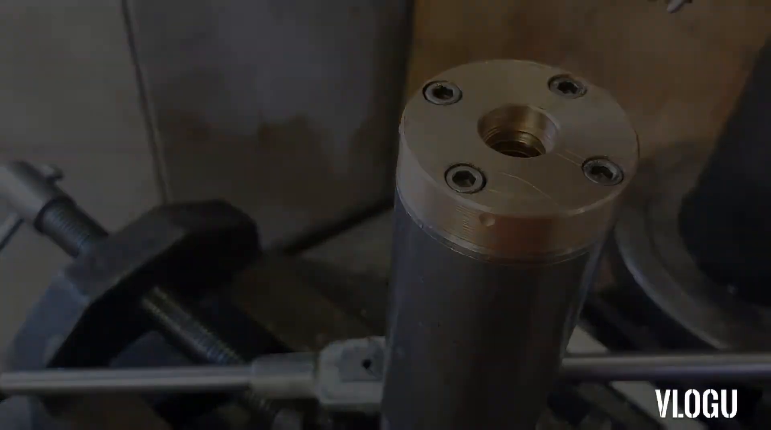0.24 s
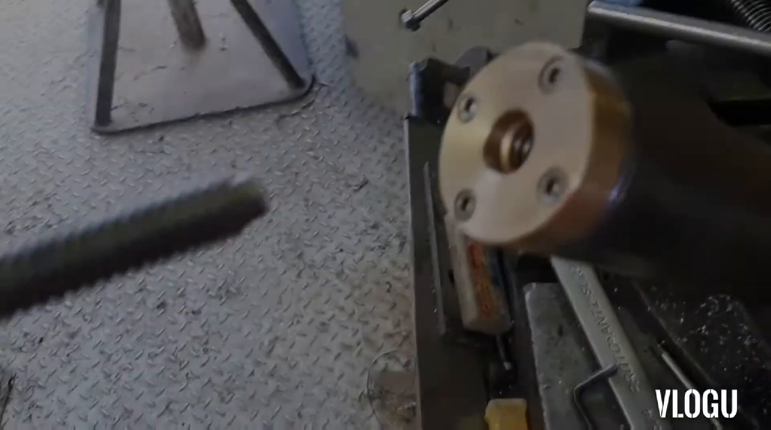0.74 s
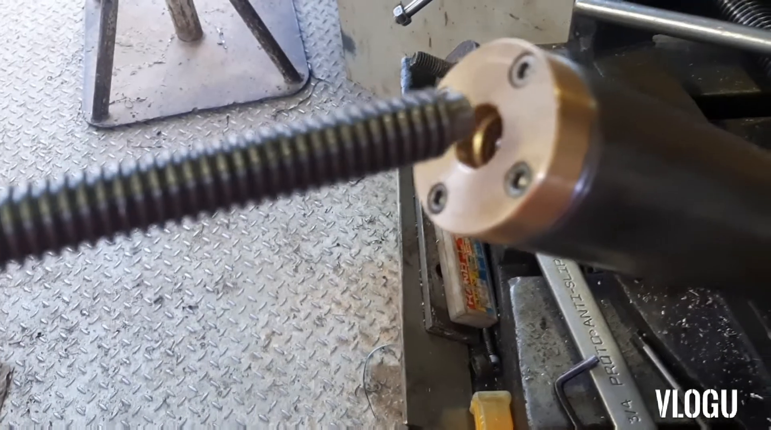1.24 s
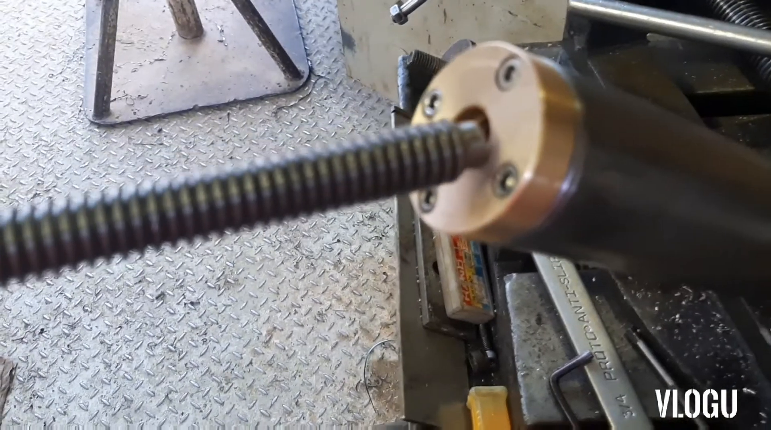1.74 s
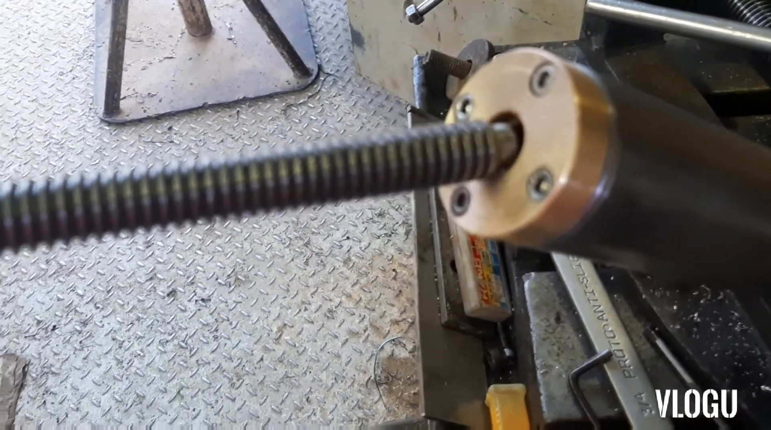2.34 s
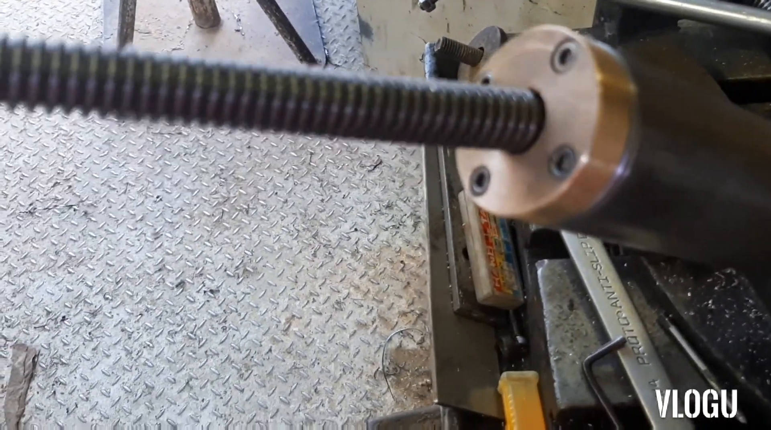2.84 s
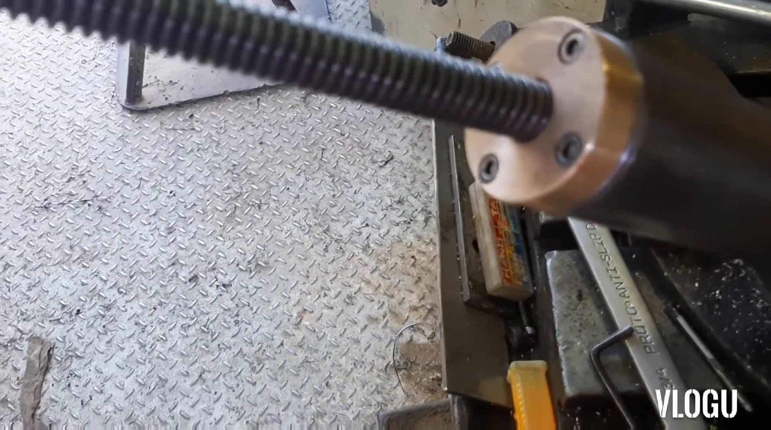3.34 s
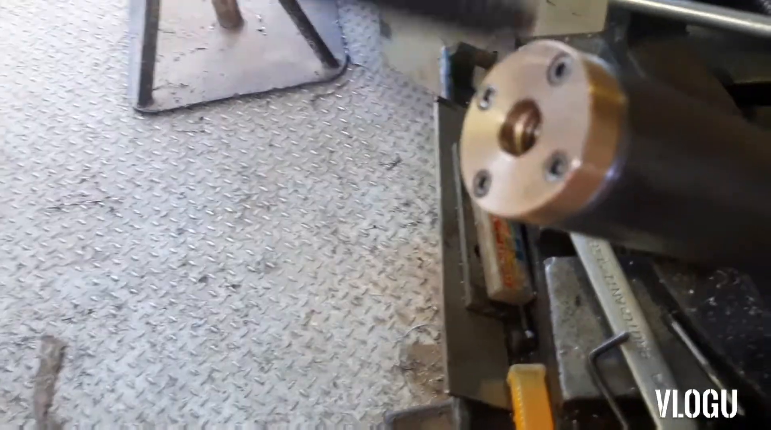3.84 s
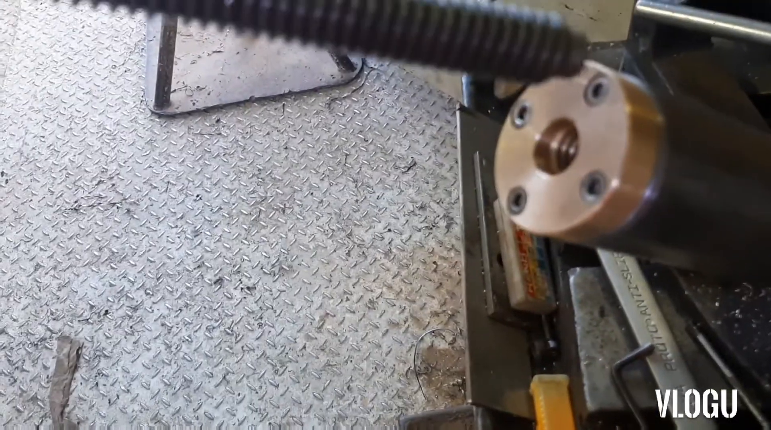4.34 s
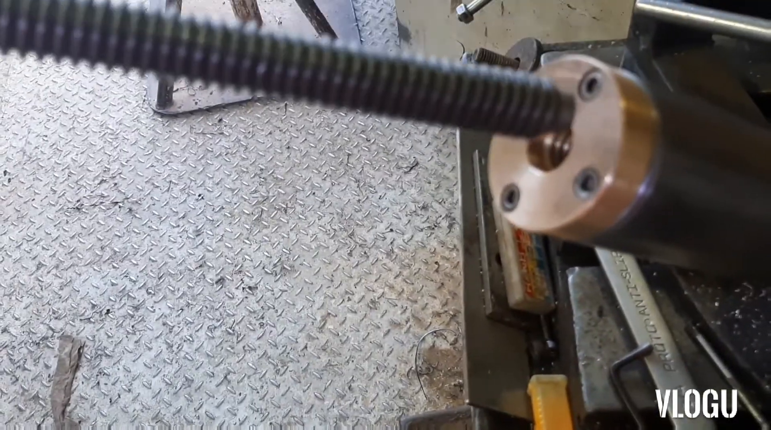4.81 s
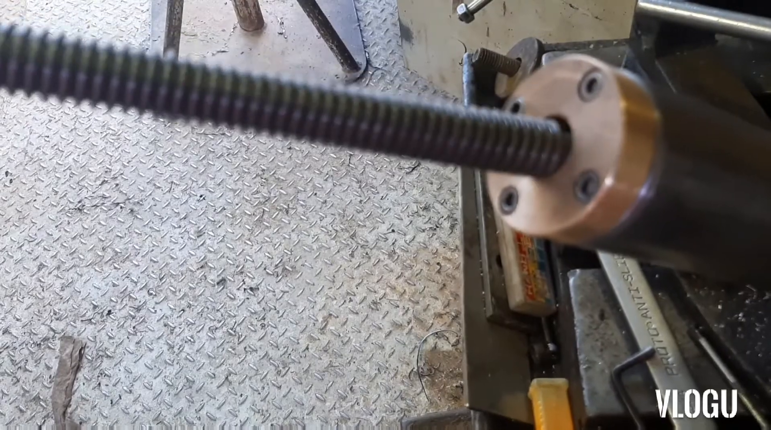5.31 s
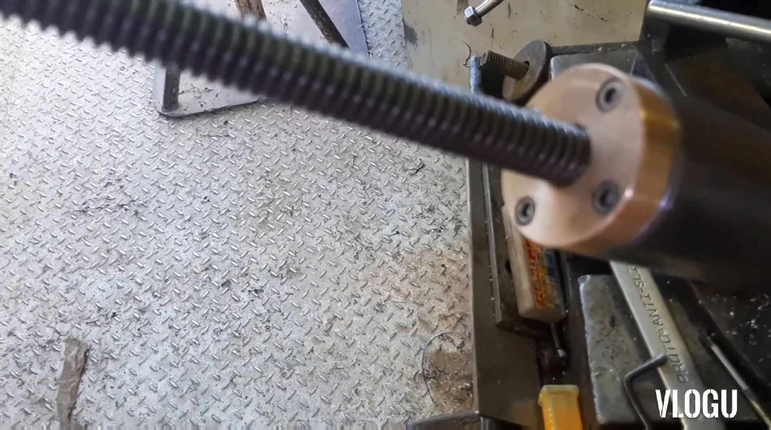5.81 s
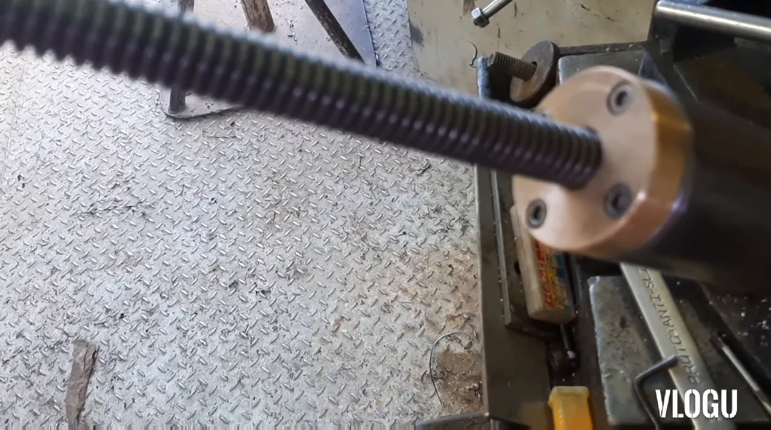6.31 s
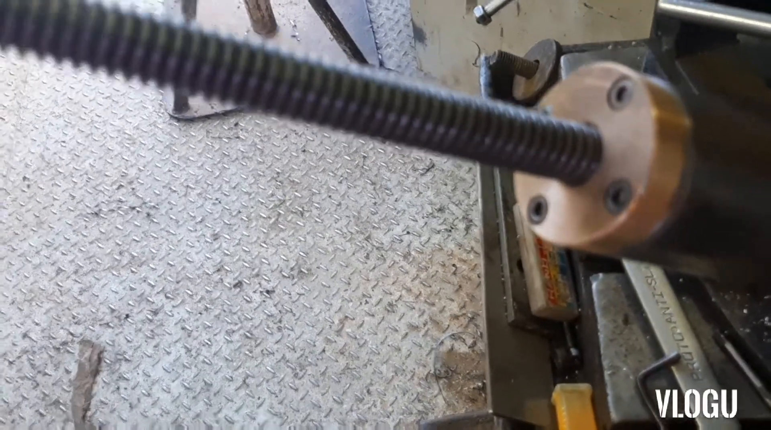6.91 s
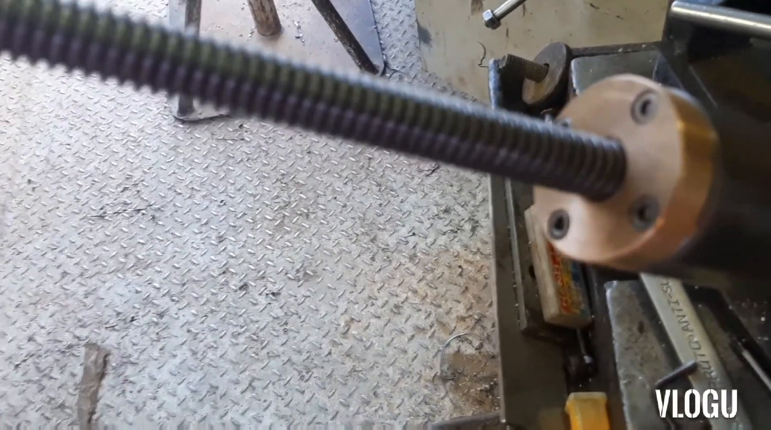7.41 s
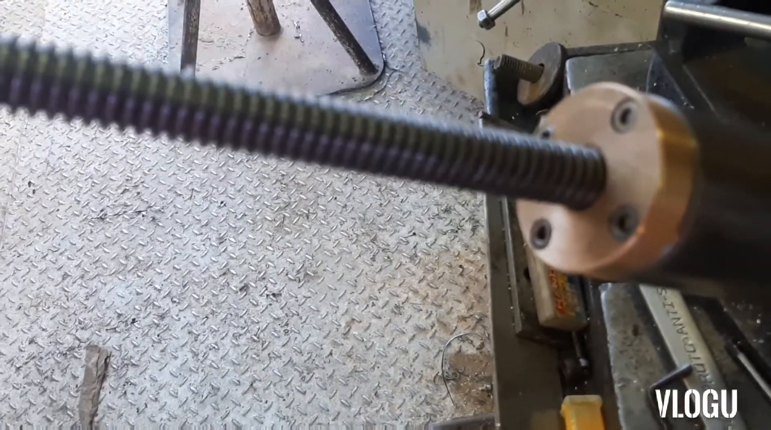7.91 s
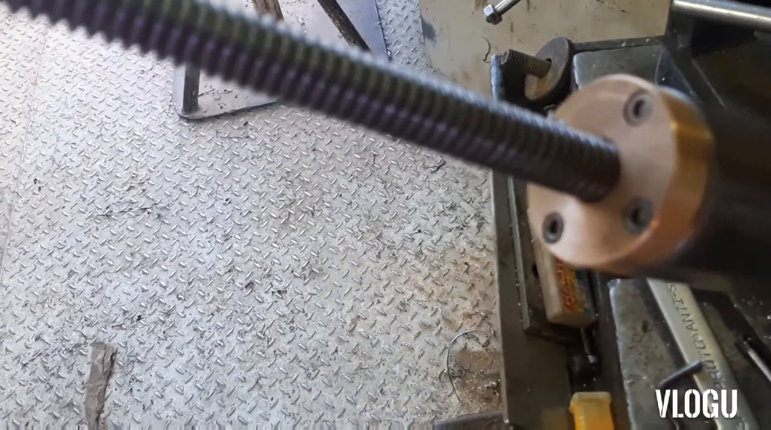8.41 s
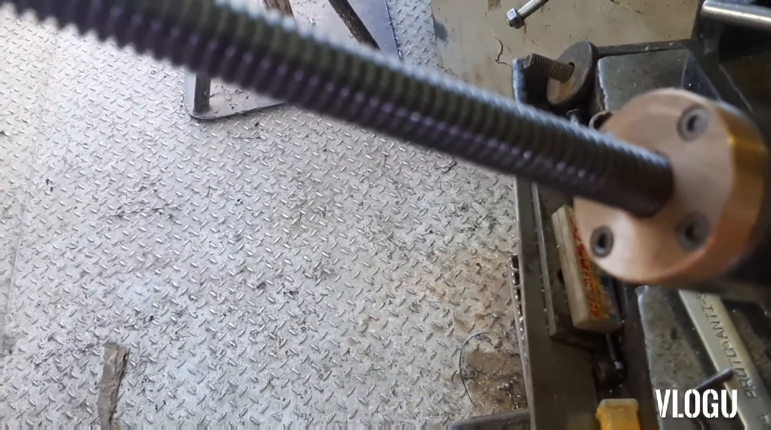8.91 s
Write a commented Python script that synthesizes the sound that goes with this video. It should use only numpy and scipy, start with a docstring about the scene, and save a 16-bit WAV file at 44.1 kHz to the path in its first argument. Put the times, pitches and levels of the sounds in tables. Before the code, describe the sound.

A lathe motor hums low with a steady pulsing throb under fan rush, drops out briefly near the start, then a few metallic clicks.

```python
"""Workshop, one microphone channel: a lathe's induction motor idles throughout, under the rush of fan and drive.
The rotor slips behind the mains field, so shaft tones and magnetic hum beat almost twice a second.
The first 1.2 s are quieter, with a short dropout to silence after 0.126 s; then the level steps up.
From 2.2 to 5.8 s a threaded steel rod, tried in a bronze nut close by, clicks a few times as filtered
noise bursts driving resonances, with a short room tail. The machine runs on to the end."""
import sys
import numpy as np
from scipy import signal
from scipy.fft import rfft, irfft
from scipy.io import wavfile

SR = 44100
rng = np.random.default_rng(int(sys.argv[2]) if len(sys.argv) > 2 else 0)


def wav_out(sig):
    """Save sig, one row per channel (or a flat mono array), as 16-bit PCM at SR to the path in sys.argv[1]."""
    wavfile.write(sys.argv[1], SR, np.round(np.clip(np.atleast_2d(sig).T, -1, 1) * 32767).astype(np.int16))


N = 403515
TIME = np.arange(N) / SR  # s
FREQS = np.maximum(np.fft.rfftfreq(N, 1 / SR), 1)  # Hz

MAINS_HZ, SHAFT_HZ = 60.012, 29.563
BEAT_CREST_S = 1.8125  # reference time at which the motor tones are aligned, apart from their spread

# Slow sway of the main hum at twice the mains frequency. Each row: time in seconds, level in dB rms.
HUM_SWAY = [(1.25, -27), (3.95, -27.5), (5.65, -26), (7.38, -28), (8.7, -26.5), (9.0, -27.5)]
# The uneven air gap modulates that hum once a turn.
# Each row: shaft turns added to the hum frequency, level in dB against the hum.
AIR_GAP_TONES = [(1, -10), (2, -9.5), (3, -22), (4, -40.5), (13, -37.5)]
# Other magnetic hum. Each row: multiple of the mains frequency, level in dB rms.
MAINS_TONES = [(1.5, -43.5), (4, -43.5), (5, -57.5), (6, -47.5), (8, -58.5), (11, -62.5)]
# Unbalance and belt drive. Each row: multiple of the shaft speed, level in dB rms.
SHAFT_TONES = [(2, -64), (3, -42.5), (5, -36.5), (6, -42), (7, -61), (8, -62.5), (15, -58.5), (19, -60),
               (24, -54.5), (30, -62)]

# Rush of fan and drive, before the housing. Each row: frequency in Hz, level in dB per Hz.
RUSH_SPECTRUM = [(25, -92), (60, -61), (130, -66), (240, -63), (300, -68), (600, -69.5), (1050, -77.5),
                 (2100, -76), (3550, -86), (5900, -87), (7400, -92.5), (8700, -96), (11500, -90.5),
                 (15800, -92.5)]
# Housing and guard resonances colouring the rush. Each row: centre in Hz, width in Hz, lift in dB.
HOUSING_RESONANCES = [(57, 9, -5), (210.5, 17, 5), (255, 12.5, 4), (350, 17, 8.5), (408, 19, 7.5),
                      (451.6, 9.6, 5), (568, 53, 4), (709.6, 22, 6), (747, 21, 4), (1253, 55, 3),
                      (1490, 123, 5), (1706, 28, 3), (2041, 65, 5), (2600, 100, 0.5), (3110, 200, 2),
                      (3900, 360, 2.5), (4420, 250, 1.5), (7850, 580, 5)]
# Thin steady whines of the drive. Each row: centre in Hz, width in Hz, level in dB rms.
DRIVE_WHINES = [(4266, 25, -62), (6730, 14, -82)]
# The bearing whine is strongest at first and fades evenly.
BEARING_HZ, BEARING_WIDTH_HZ = 1518, 18
BEARING_START_DB, BEARING_FADE_DB_PER_S = -49.5, 1.3
# The belt drone swells once, then eases off.
BELT_CREST_S, BELT_CREST_DB, BELT_RISE_DB_PER_S, BELT_FALL_DB_PER_S = 3.8, -44, 3, 1.0

# Rod touching the nut. Each row: start in seconds, level in dB before the rod's overall lift,
# hardness as the graze's top frequency in Hz, share (0 to 1) that drives the free ringing.
ROD_TOUCHES = [(2.154, -23, 3500, 0), (3.055, -29, 3500, 0), (3.189, -18.5, 5500, .2),
               (3.782, -23, 6500, .1), (3.8193, -8.5, 12400, 0.61), (5.659, -9.5, 6540, 0.5),
               (5.6747, -13.5, 6000, .18), (5.752, -8, 3200, 0)]
# Rod and nut while they press together. Each row: centre in Hz, width in Hz, level in dB.
PRESSED_MODES = [(650, 400, -16), (1580, 220, -12), (2080, 260, -12), (2580, 170, -1), (3080, 220, 3),
                 (4100, 400, -7), (4560, 400, -4), (6000, 1200, -12), (7850, 700, -13), (9750, 400, -11),
                 (12800, 1300, -12)]
# Rod ringing on once it comes free. Each row: centre in Hz, width in Hz, level in dB.
FREE_MODES = [(2620, 22, 0), (3490, 14, 4), (4580, 18, -2), (6760, 14, 5), (7020, 18, -2)]
# In every touch a thread crest grazes first, then the rod seats with a duller scrape.
GRAZE_DB, SEAT_DELAY_S, SEAT_TOP_SHARE, SCRAPE_DECAY_S = -3.5, .003, 0.76, 0.0028

SHOP_T60_S, SHOP_DB = 0.43, -11.5
# Overall level, silent in between. Each row: start in seconds, end in seconds, gain in dB.
LEVEL_STRETCHES = [(0, .126, -6.5), (.309, 1.192, -6.5), (1.192, 9.2, 0)]
CUTOFF_HZ = 15850


def from_db(db):
    """Decibels to gain."""
    return 10 ** (np.asarray(db) / 20)


def rms_one(x):
    """Scale to unit rms."""
    return x / np.sqrt(np.mean(x ** 2) + 1e-20)


def drift(rate):
    """Slow chance with spread near 1, changing about rate times a second."""
    # twice-smoothed noise at one value per 100 samples; the first 2000 values let it settle
    r = np.exp(-200 * np.pi * rate / SR)
    noise = rng.standard_normal(N // 100 + 2002)
    slow = signal.lfilter([1], [1, -2 * r, r * r], noise)[2000:]
    return np.interp(np.arange(N) / 100, np.arange(len(slow)), rms_one(slow - slow.mean()))


def resonate(x, hz, width):
    """A two-pole resonance with gain about 1 at its peak."""
    r = np.exp(-np.pi * width / SR)
    feed = np.array([1, 0, -1]) * (1 - r * r) / 2
    feedback = [1, -2 * r * np.cos(2 * np.pi * hz / SR), r * r]
    return signal.lfilter(feed, feedback, x + 1e-18)


def partial(hz, waver_hz=640, waver_rate=1.77):
    """A motor tone of unit rms; the shorter its wavelength, the more it wavers in the room."""
    # bending waves in the bed spread the tones in time, which softens each throb
    spread = ((hz - 2 * MAINS_HZ - SHAFT_HZ / 2) / 103) ** 2
    angle = 2 * np.pi * (hz * (TIME - BEAT_CREST_S) + spread)
    depth = (hz / waver_hz) ** 2
    in_phase = (1 + depth * drift(waver_rate)) * np.cos(angle)
    quadrature = depth * drift(waver_rate) * np.sin(angle)
    return rms_one(in_phase + quadrature)


def motor():
    """Magnetic tones and shaft tones lie a slip frequency apart and beat together."""
    hum_gain = from_db(np.interp(TIME, *np.transpose(HUM_SWAY)))
    field = partial(2 * MAINS_HZ)
    for turns, db in AIR_GAP_TONES:
        field = field + from_db(db) * partial(2 * MAINS_HZ + round(turns) * SHAFT_HZ)
    # mains multiples go in half steps
    iron = sum(from_db(db) * partial(round(2 * k) / 2 * MAINS_HZ) for k, db in MAINS_TONES)
    shaft = sum(from_db(db) * partial(round(k) * SHAFT_HZ) for k, db in SHAFT_TONES)
    return hum_gain * field + iron + shaft


def fan_rush(flutter_db=1.0, flutter_rate=9):
    """Fan air and bearing noise: white noise shaped by a spectrum and the housing resonances."""
    hz, db = np.transpose(RUSH_SPECTRUM)
    colour_db = np.interp(np.log(FREQS), np.log(hz), db)
    for centre, width, lift in HOUSING_RESONANCES:
        colour_db = colour_db + lift / (1 + (2 * (FREQS - centre) / width) ** 2)
    white = rfft(rng.standard_normal(N))
    rush = irfft(white * from_db(colour_db) * np.sqrt(SR / 2), N)
    # the low, mechanical part flutters with the load; the hiss stays smoother
    rumble = signal.sosfilt(signal.butter(1, 2500, fs=SR, output="sos"), rush)
    return rush + rumble * (from_db(flutter_db * drift(flutter_rate)) - 1)


def drive_whines():
    """Narrow resonances driven by noise: steady drive whines and the fading bearing."""
    bearing_db = BEARING_START_DB - BEARING_FADE_DB_PER_S * TIME
    whines = list(DRIVE_WHINES) + [(BEARING_HZ, BEARING_WIDTH_HZ, bearing_db)]
    total = np.zeros(N)
    for centre, width, db in whines:
        total += from_db(db) * rms_one(resonate(rng.standard_normal(N), centre, width))
    return total


def belt_drone():
    """A belt tone at twelve times the shaft speed, rising to one crest and easing off."""
    rise_db = BELT_RISE_DB_PER_S * (BELT_CREST_S - TIME)
    fall_db = BELT_FALL_DB_PER_S * (TIME - BELT_CREST_S)
    belt_db = BELT_CREST_DB - np.maximum(rise_db, fall_db)
    return from_db(belt_db) * partial(12 * SHAFT_HZ)


def rod(level_db=4):
    """Grazes and firmer scrapes of thread crests drive the rod; harder ones are brighter, a freed rod rings on."""
    force, free_force = np.zeros(N), np.zeros(N)
    age = TIME[:SR // 20]
    for start, seat_db, hardness_hz, free_share in ROD_TOUCHES:
        graze = (start, seat_db + GRAZE_DB, hardness_hz)
        seat = (start + SEAT_DELAY_S, seat_db, hardness_hz * SEAT_TOP_SHARE)
        for onset, db, top_hz in (graze, seat):
            scrape = rng.standard_normal(len(age)) * np.exp(-age / SCRAPE_DECAY_S)
            soften = signal.butter(2, min(top_hz, .45 * SR), fs=SR, output="sos")
            touch = from_db(db + level_db) * signal.sosfilt(soften, scrape)
            first = round(onset * SR)
            span = slice(first, first + len(age))
            force[span] += touch
            free_force[span] += free_share * touch
    click = np.zeros(N)
    for k, (hz, width, db) in enumerate(PRESSED_MODES):
        click += (-1) ** k * from_db(db) * resonate(force, hz, width)  # signs alternate
    ring = sum(from_db(db) * resonate(free_force, hz, width) for hz, width, db in FREE_MODES)
    return click + ring


def workshop(x):
    """A short, diffuse tail from floor and machines: decaying noise convolved with the close sound."""
    age = TIME[:SR // 2]
    decay = from_db(-60 * age / SHOP_T60_S)
    tail = rng.standard_normal(len(age)) * decay * (age > .004)  # the tail starts after 4 ms
    return x + from_db(SHOP_DB) * signal.fftconvolve(x, tail / np.linalg.norm(tail))[:N]


def scene():
    """The running machine, with the rod's clicks close by and their tail in the workshop."""
    machine = motor() + fan_rush() + drive_whines() + belt_drone()
    return (machine + workshop(rod()))[None, :]


def record(dry):
    """The level steps between stretches, with one short silence; a steep low-pass cuts the top."""
    gain = np.zeros(N)
    for start, end, db in LEVEL_STRETCHES:
        gain += from_db(db) * ((TIME >= start) & (TIME < end))
    low_pass = signal.ellip(12, .1, 90, CUTOFF_HZ, fs=SR, output="sos")
    return signal.sosfilt(low_pass, dry * gain)


dry = scene()
out = record(dry)
wav_out(out)
```